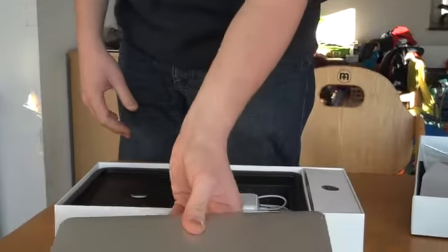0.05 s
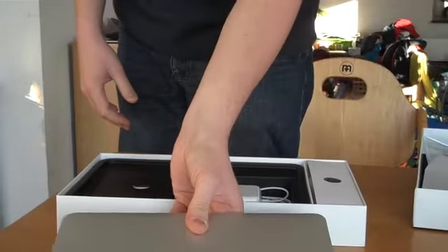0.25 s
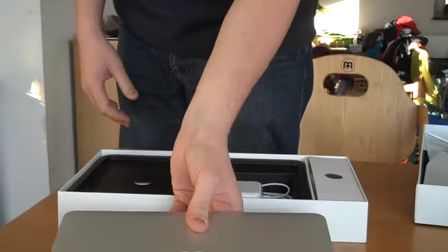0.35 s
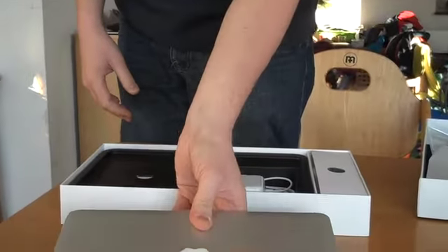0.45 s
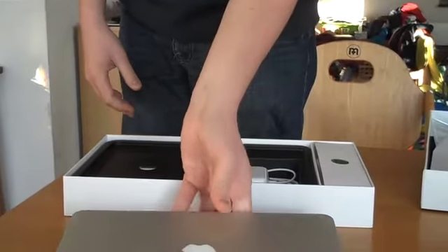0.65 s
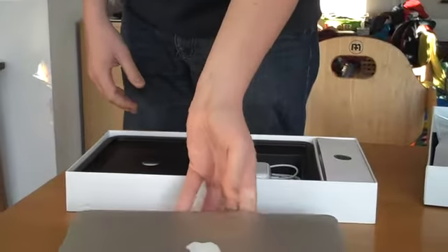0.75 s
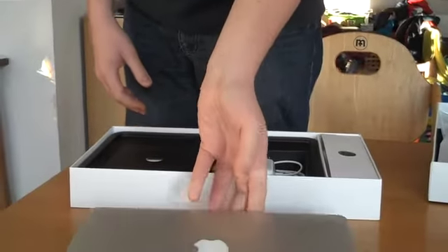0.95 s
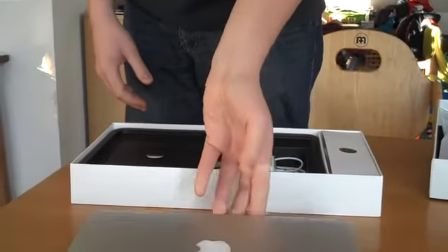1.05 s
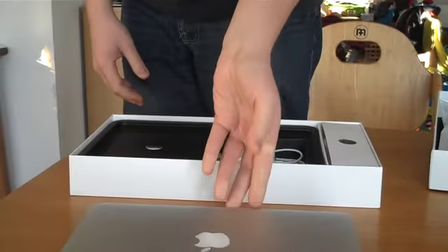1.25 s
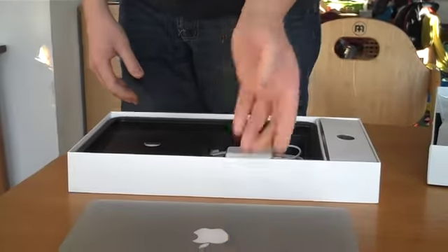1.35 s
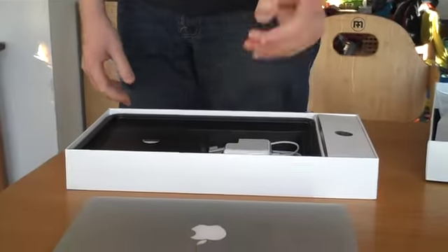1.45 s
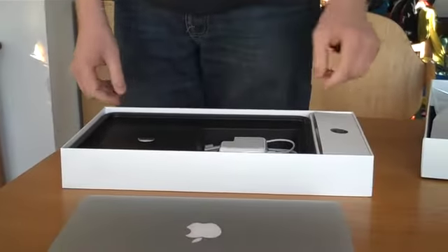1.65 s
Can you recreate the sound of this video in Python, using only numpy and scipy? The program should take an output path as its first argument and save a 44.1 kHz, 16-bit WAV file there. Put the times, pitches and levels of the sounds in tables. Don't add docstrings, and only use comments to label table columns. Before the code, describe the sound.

A metal laptop knocks down onto a wooden table, scrapes briefly, then knocks and settles again.

```python
import sys
import numpy as np
from scipy import signal
from scipy.fft import rfft, irfft, next_fast_len
from scipy.io import wavfile
from scipy.ndimage import map_coordinates

SR = 44100
rng = np.random.default_rng(int(sys.argv[2]) if len(sys.argv) > 2 else 0)


def how_loud(loudness_db):
    steps = np.asarray(loudness_db, float) / 20
    return 10 ** steps


def pcm_store(signal):
    levels = np.round(np.clip(np.atleast_2d(signal), -1, 1) * 32767)
    wavfile.write(sys.argv[1], SR, levels.astype(np.int16).T)


N = 74970


def unit(x):
    return x / np.sqrt(np.mean(x ** 2) + 1e-20)


def along(points, hz):
    f, v = np.transpose(points)
    return np.interp(np.log(hz + 1), np.log(f + 1), v)


def wobble(rate):
    knots = rng.standard_normal(int(N * rate / SR) + 4)
    return map_coordinates(knots, [np.arange(N) * rate / SR])


def filtered(x, response):
    m = next_fast_len(N + SR // 2)
    return irfft(rfft(x, m) * response(np.fft.rfftfreq(m, 1 / SR)), m)[..., :N]


def coloured(x, spectrum):
    points = [(0.65, -62)] + list(spectrum)
    return unit(filtered(x, lambda hz: how_loud(along(points, hz))))


def resonant(x, peaks):
    def response(f):
        total = 0
        for k, (centre, width, db) in enumerate(peaks):
            band = 1j * f * width
            total = total + (-1) ** k * how_loud(db) * band / (centre * centre - f * f + band)
        return total
    return unit(filtered(x, response))


def ringing(hz, db, t60, phase, t):
    decay = how_loud(db[:, None] - 60 * t / t60[:, None])
    return (decay * np.sin(2 * np.pi * (hz[:, None] * t + phase[:, None]))).sum(0)


def grit(per_s, spread_db):
    when, sign, size = rng.random((3, N))
    return (when < per_s / SR) * np.sign(sign - .5) * how_loud(-spread_db * np.log(size + 1e-4))


# (frequency [Hz], density [dB per Hz])
HISS_SPECTRUM = [(12, -4.5), (30, 5), (150, -5.5), (900, -8), (2500, -7.5), (5000, -16), (7600, -21),
                 (8800, -54.5)]
HISS_DB = -71


def hiss():
    return how_loud(HISS_DB + 0.13 * wobble(1.3)) * coloured(rng.standard_normal(N), HISS_SPECTRUM)


# (frequency [Hz], t60 [s])
ROOM_T60 = [(150, 0.75), (800, 0.58), (3000, 0.48), (8000, 0.4)]
KNOCK_ROOM_DB, SCRAPE_ROOM_DB = -7, -9


def room(x):
    hz, t, z = signal.stft(rng.standard_normal(SR // 2), SR, nperseg=256)
    decay = how_loud(-60 * t / along(ROOM_T60, hz)[:, None])
    tail = signal.istft(z * decay, SR, nperseg=256)[1]
    delayed = np.pad(x, (round(.006 * SR), 0))
    return signal.fftconvolve(delayed, tail / np.linalg.norm(tail))[:N]


# (time [s], pressure level [dB], dryness as treble gain [dB])
RUB = [(.2, -65.5, 14), (.25, -57, -17.5), (.45, -58, 1), (.56, -60, -3), (.66, -57, 1.5), (.74, -56, -3),
       (0.809, -57, -2.5), (.85, -64, -6), (.9, -61.5, -4.5), (0.969, -59, -7.5), (1.01, -61.5, -6.5),
       (1.05, -59, -7), (1.09, -69, -8), (1.14, -70.5, -7), (1.46, -73, -4), (1.53, -75, -2.5),
       (1.62, -76, 4), (1.69, -80, -2)]
# (frequency [Hz], density [dB per Hz])
SKIN = [(88, -45.5), (150, -12.5), (782, -7), (1240, -3.5), (1680, -6.5), (1900, -6), (3210, -6.5),
        (6350, -11), (8770, -33.5), (11400, -66), (19300, -120)]
# (frequency [Hz], width [Hz], level [dB])
LID_MODES = [(760, 110, 3), (1095, 50, 7), (1660, 160, 4), (2300, 250, 0)]
LID_DB, DRY_HZ = -2.5, 3500


def rubbing():
    s, db, dry_db = np.transpose(RUB)
    t = np.arange(N) / SR
    pressure = how_loud(np.interp(t, s, db, left=-120, right=-120) + 1.2 * wobble(30))
    drag = rng.standard_normal(N) + .5 * grit(600, 2.5)
    skin = unit(coloured(drag, SKIN) + how_loud(LID_DB) * resonant(drag, LID_MODES))
    fizz = filtered(skin, lambda f: f > DRY_HZ)
    return pressure * (skin + (how_loud(np.interp(t, s, dry_db)) - 1) * fizz)


SLIP_S, SLIP_END_S, SLIP_DB = .9, 1.07, -67
SLIP_HZ, SLIP_RISE_HZ_PER_S, SLIP_WIDTH_HZ = 3080, 2800, 560


def finger_slip():
    t = np.arange(N) / SR
    phase = 2 * np.pi * np.cumsum(SLIP_HZ + SLIP_RISE_HZ_PER_S * (t - SLIP_S)) / SR
    slip = wobble(SLIP_WIDTH_HZ) * np.cos(phase) + wobble(SLIP_WIDTH_HZ) * np.sin(phase)
    gate = np.clip((t - SLIP_S) / 0.01, 0, 1) * np.clip((SLIP_END_S - t) / 0.0042, 0, 1)
    return how_loud(SLIP_DB) * gate * slip


# (start [s], swell [s], release t60 [s], peak level [dB])
SCRAPES = [
    (0.353, 0.026, 0.17, -40),
    (1.192, 0.025, .16, -37),
]
# (frequency [Hz], width [Hz], level [dB])
SHELL_MODES = [
    [(840, 200, -14), (1340, 160, -8), (2350, 62, -6), (2904, 35, -2.5), (3046, 50, 2), (3530, 190, -19.5),
     (4300, 120, -7.5), (4330, 29, -15.5), (4950, 97, -17.5), (5370, 60, -14.5), (6080, 20, -5),
     (6420, 25, -12.5), (7170, 110, -16.5), (7900, 450, -26.5)],
    [(740, 26, -6.5), (1342, 40, -6), (2354, 9.8, 4), (2520, 160, -8.5), (2910, 26, 1), (2994, 50, 2.5),
     (3510, 170, -8.5), (4070, 60, -3), (4520, 77, -5), (5415, 110, -10), (5530, 35, -7), (5845, 11, -1),
     (6240, 90, -10), (7390, 183, -15.5)],
]
# (frequency [Hz], density [dB per Hz])
GRIND = [(88, -30), (150, -1.5), (1650, -9.5), (2360, -7), (2710, -8.5), (3000, -11.5), (3680, -19.5),
         (6030, -9), (8770, -42), (11400, -58), (19300, -120)]
CHATTER_PER_S, CHATTER_DB, GRIND_DB = 4000, 2, -4.5
BITE_DB, BITE_S, EASE_S = -2, 0.0094, 0.016


def scrapes():
    t, out = np.arange(N) / SR, 0
    for (s, swell, t60, db), shell in zip(SCRAPES, SHELL_MODES):
        after = np.clip(t - s - swell, 0, 9)
        swell_db = BITE_DB * np.clip(1 - (t - s) / swell, 0, 1)
        release_db = -60 / t60 * after ** 2 / (after + EASE_S)
        stroke = np.clip((t - s) / BITE_S, 0, 1) * how_loud(swell_db + release_db + wobble(150))
        chatter = resonant(grit(CHATTER_PER_S, CHATTER_DB) * stroke, shell)
        grind = coloured(grit(CHATTER_PER_S, CHATTER_DB), GRIND) * stroke
        loudness = np.sqrt(np.mean(stroke ** 2))
        out = out + how_loud(db) * (loudness * chatter + how_loud(GRIND_DB) * grind)
    return out


# (time [s], thump level [dB], long ring level [dB])
THUDS = [(.028, -69.5, -85), (.067, -73.5, -89), (0.239, -51.5, -83.5), (1.03, -67.5, -75),
         (0.205, -52.5, -83), (.297, -41, -76.5), (.325, -46.5, -78), (0.402, -55, -81),
         (1.172, -36.5, -47), (1.2, -50, -58.5), (1.259, -47, -76)]
# (frequency [Hz], level [dB], t60 [s])
TABLE_MODES = [(116, -3.5, .08), (166, -2, 0.052), (215, -10.5, 0.054), (307.5, -1.5, 0.071),
               (389.3, -1, 0.11)]
THUD_RISE_S = 0.0037
RING_HZ, RING_T60 = 135, .6
BEAT_HZ, BEAT_SHARE = 135.5, .4


def thuds():
    out, t = np.zeros(N + SR), np.arange(SR // 2) / SR
    hz, level, t60 = np.transpose(TABLE_MODES)
    for s, thump_db, ring_db in THUDS:
        thump = how_loud(thump_db) * ringing(hz, level, t60, rng.random(len(hz)), t)
        main = np.sin(2 * np.pi * RING_HZ * (t + s))
        beating = BEAT_SHARE * np.sin(2 * np.pi * BEAT_HZ * t)
        ring = how_loud(ring_db - 60 * t / RING_T60) * (main + beating)
        out[round(s * SR):][:len(t)] += (thump + ring) * (1 - np.exp(-t / THUD_RISE_S))
    return out[:N]


# (time [s], crack level [dB], brightest frequency [Hz], hollow level [dB], hollow frequency [Hz])
KNOCKS = [(.2065, -28.5, 1900, -30.5, 870), (.238, -37.5, 1500, -33.5, 877), (.2965, -23.5, 1465, -48, 910),
          (0.2979, -13, 3040, -14, 815), (.322, -24, 2600, -45, 830), (.679, -33, 2200, -47, 725),
          (.683, -62, 900, -40.5, 778), (.7115, -35, 2750, -45.5, 770), (1.027, -65, 2000, -51, 682),
          (1.1475, -41.5, 3500, -63, 1065), (1.1477, -46, 1090, -42.5, 1120),
          (1.1725, -21, 2790, -31.5, 740), (1.174, -18.5, 5440, -37, 935), (1.181, -31.5, 1500, -29.5, 740),
          (1.177, -30.5, 1700, -34, 777), (1.188, -38.5, 900, -39, 684), (1.195, -31.5, 1200, -34.5, 922)]
# (frequency [Hz], level [dB])
BOARD = [(250, -16.5), (500, -5.5), (850, 2.5), (1600, 4), (2900, 5), (4200, -1), (5600, -3.5), (8500, -23)]
# (frequency [Hz], t60 [s])
BOARD_T60 = [(300, .045), (900, .024), (2500, .011), (7000, .007)]
# (ratio to hollow frequency [1], level [dB], t60 [s])
HOLLOW = [(.49, -12, .04), (.86, -6, .025), (.95, -2, .03), (1.03, 0, .03), (1.17, -5, .025)]
BOARD_MODES, FOCUS_DB_PER_OCTAVE = 90, 4.5
KNOCK_DB, RISE_S = -4.5, 0.00079


def knocks():
    out, t = np.zeros(N + SR), np.arange(SR // 10) / SR
    ratio, level, t60 = np.transpose(HOLLOW)
    for s, db, bright_hz, hollow_db, hollow_hz in KNOCKS:
        place, phase = rng.random((2, BOARD_MODES))
        hz = 250 + 8400 * ((np.arange(BOARD_MODES) + place) / BOARD_MODES) ** 1.5
        shape_db = along(BOARD, hz) - FOCUS_DB_PER_OCTAVE * abs(np.log2(hz / bright_hz))
        crack = ringing(hz, db + shape_db, along(BOARD_T60, hz), phase, t) / 3
        hollow = ringing(ratio * hollow_hz, hollow_db + level, t60, 0 * t60, t)
        onset = 1 - np.exp(-t / RISE_S)
        out[round(s * SR):][:len(t)] += how_loud(KNOCK_DB) * (crack + hollow) * onset
    return out[:N]


MIC_LOW_HZ = 105


def scene():
    impact, scrape = knocks() + thuds(), scrapes()
    reverberant = room(how_loud(KNOCK_ROOM_DB) * impact + how_loud(SCRAPE_ROOM_DB) * scrape)
    sound = impact + scrape + rubbing() + finger_slip() + reverberant
    heard = filtered(sound, lambda f: (1j * f / (MIC_LOW_HZ + 1j * f)) ** 2)
    return (heard + hiss())[None]


def top_cut(x):
    return signal.sosfilt(signal.butter(12, 8920, fs=SR, output="sos"), x)


TOP_HZ, OFFSET = 8950, -.0004


def record(dry):
    mix = filtered(dry, lambda hz: hz < TOP_HZ) + OFFSET
    return top_cut(mix)


dry = scene()
out = record(dry)
pcm_store(out)
```